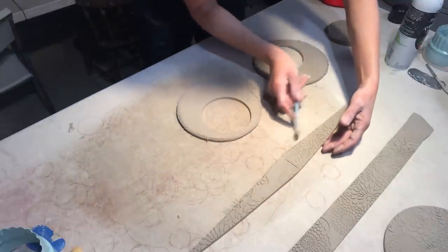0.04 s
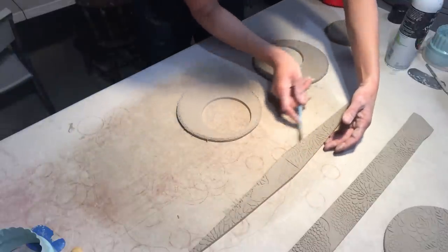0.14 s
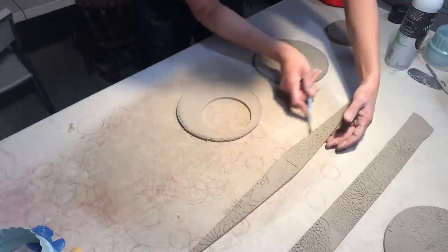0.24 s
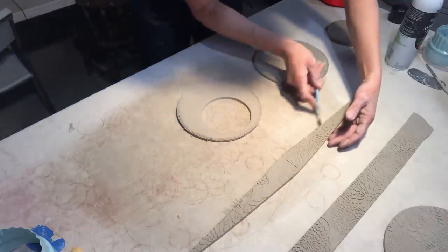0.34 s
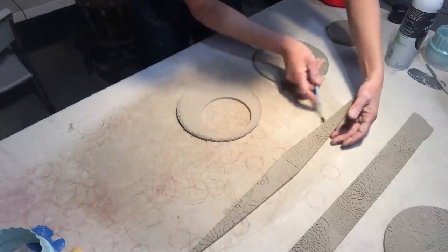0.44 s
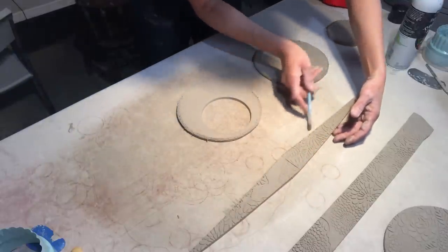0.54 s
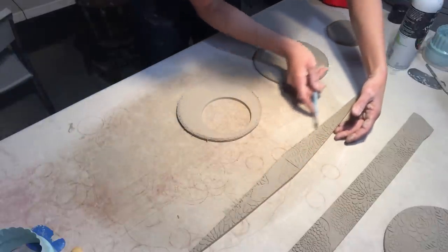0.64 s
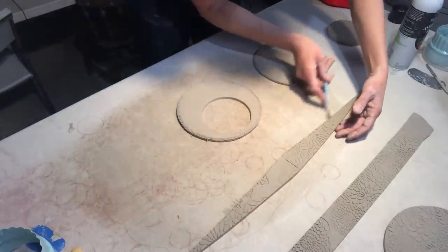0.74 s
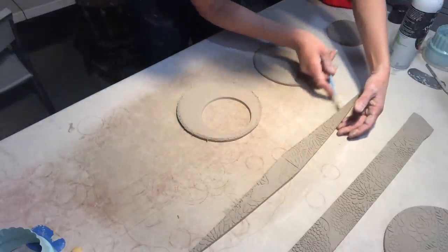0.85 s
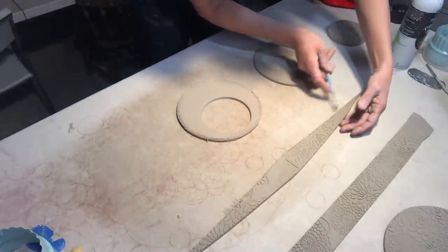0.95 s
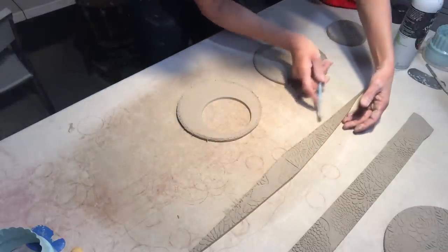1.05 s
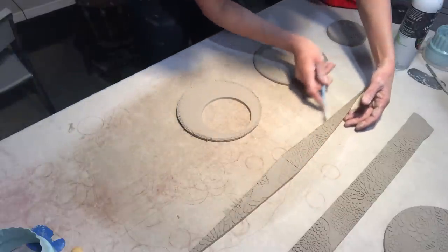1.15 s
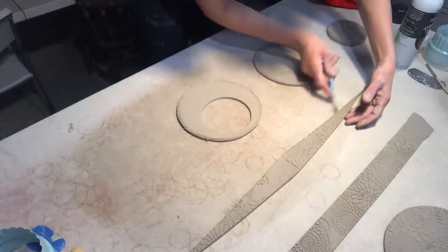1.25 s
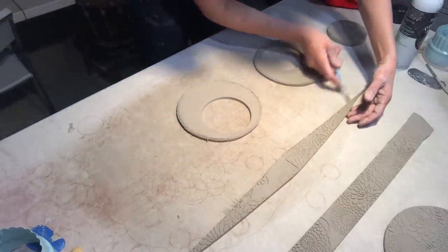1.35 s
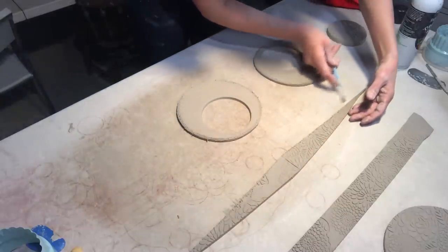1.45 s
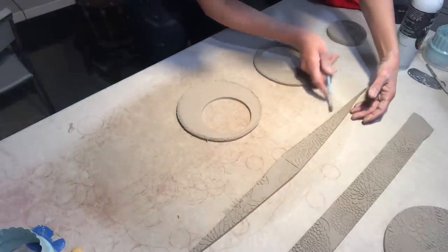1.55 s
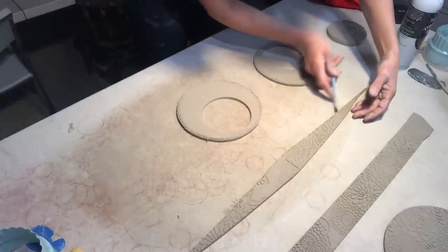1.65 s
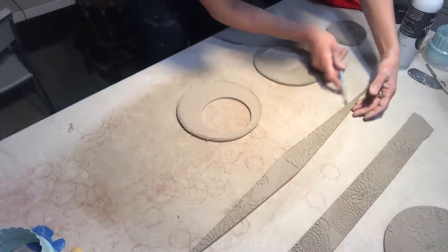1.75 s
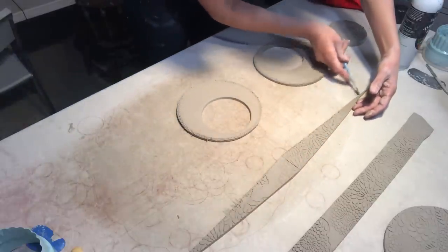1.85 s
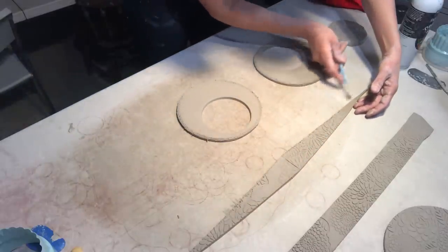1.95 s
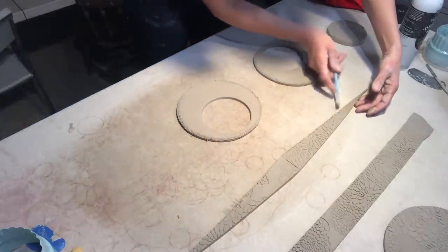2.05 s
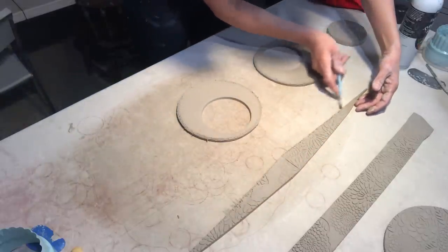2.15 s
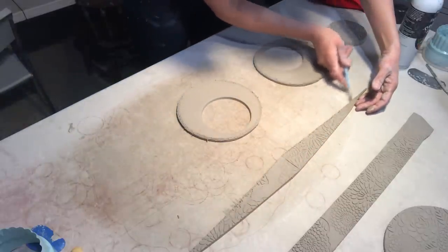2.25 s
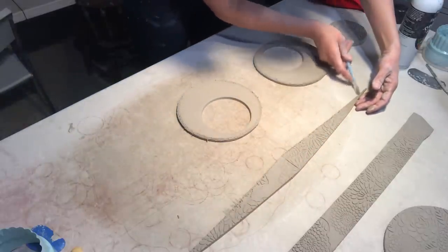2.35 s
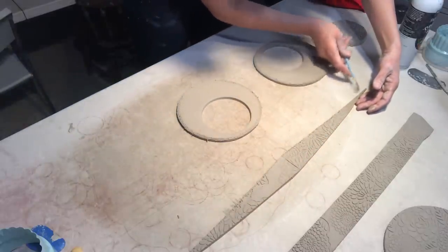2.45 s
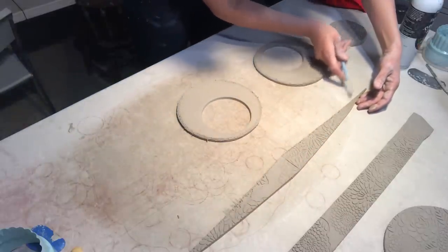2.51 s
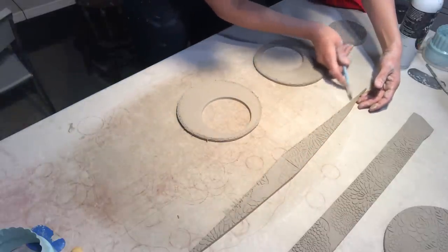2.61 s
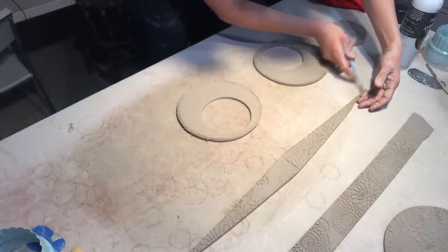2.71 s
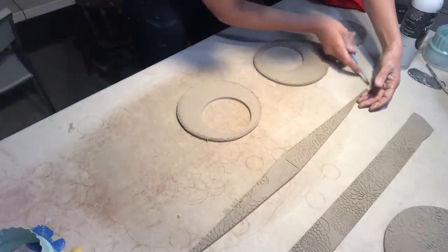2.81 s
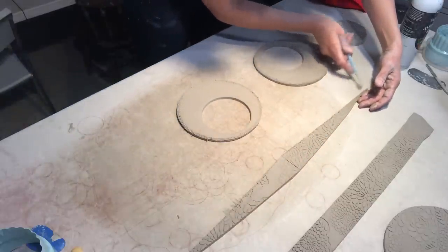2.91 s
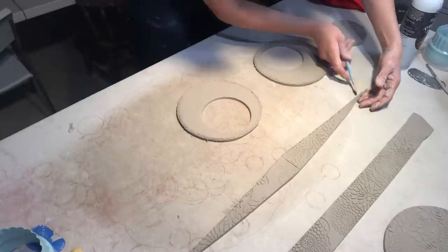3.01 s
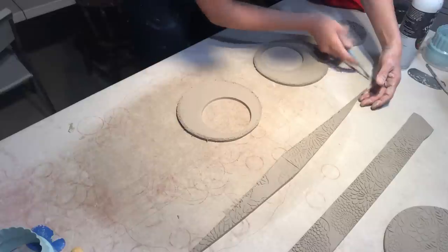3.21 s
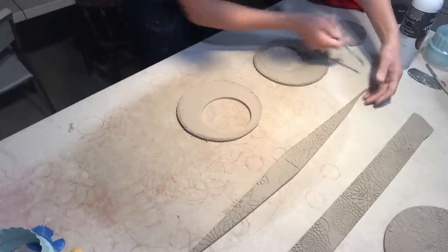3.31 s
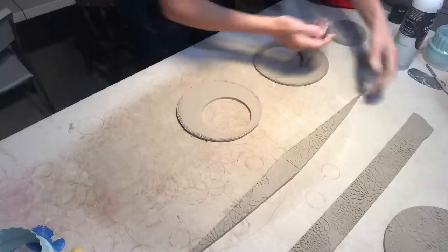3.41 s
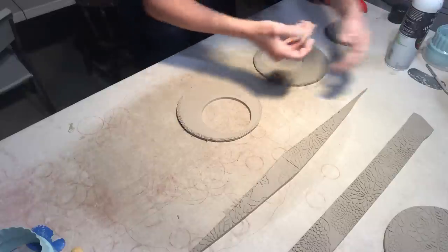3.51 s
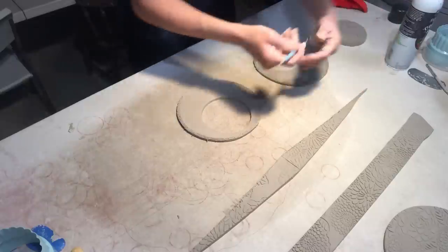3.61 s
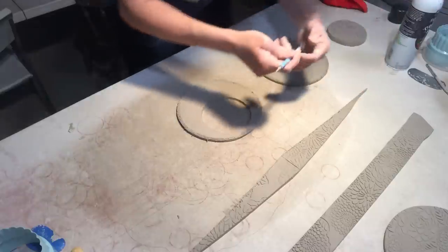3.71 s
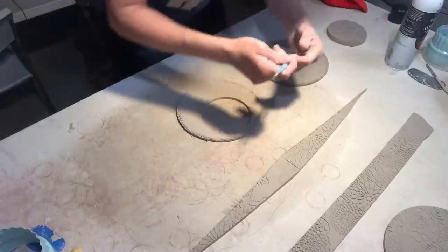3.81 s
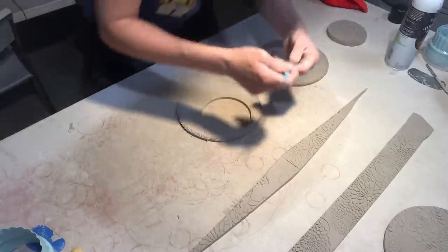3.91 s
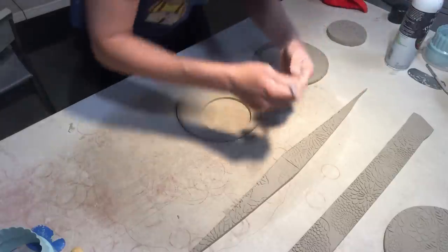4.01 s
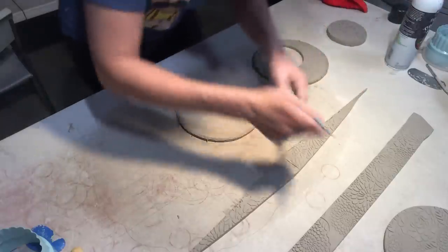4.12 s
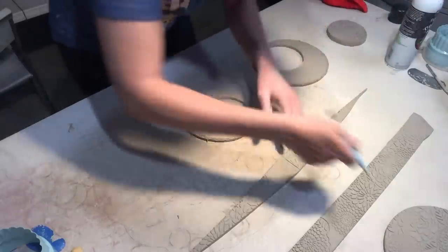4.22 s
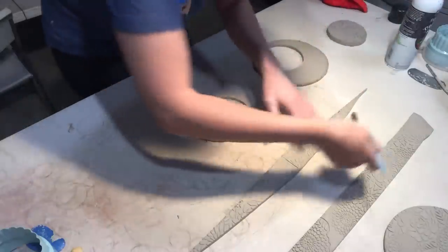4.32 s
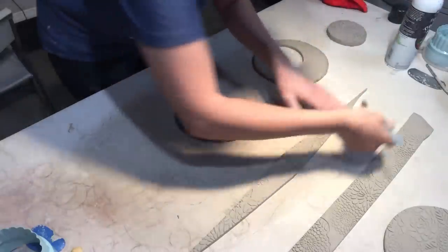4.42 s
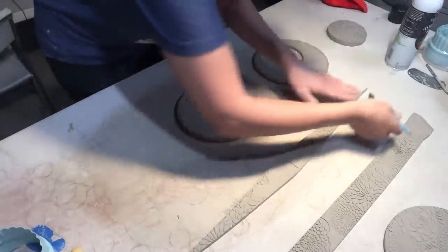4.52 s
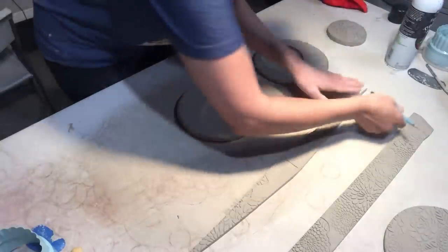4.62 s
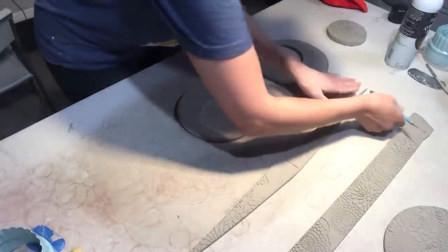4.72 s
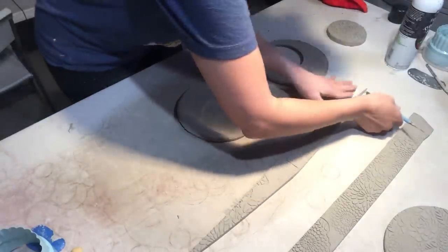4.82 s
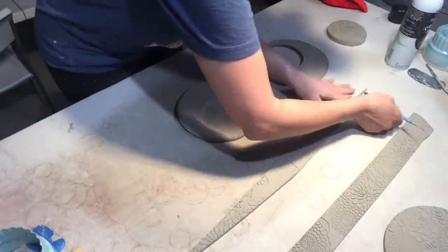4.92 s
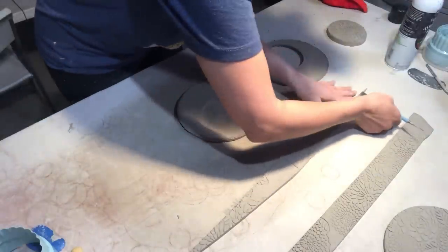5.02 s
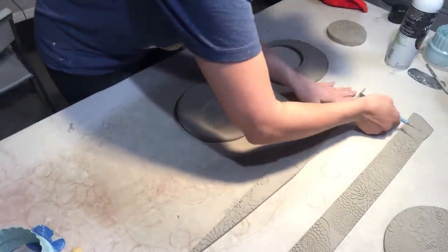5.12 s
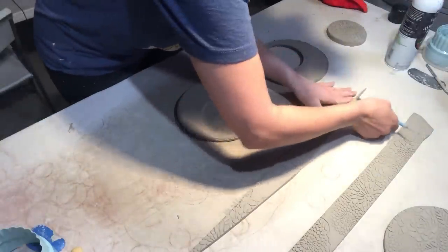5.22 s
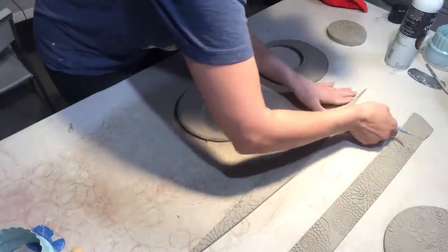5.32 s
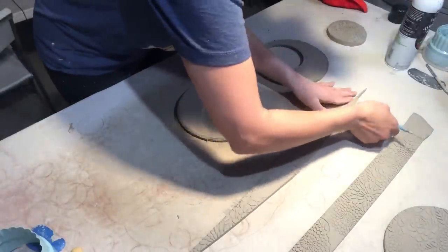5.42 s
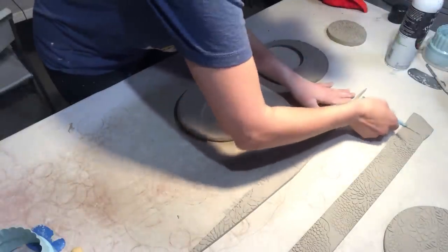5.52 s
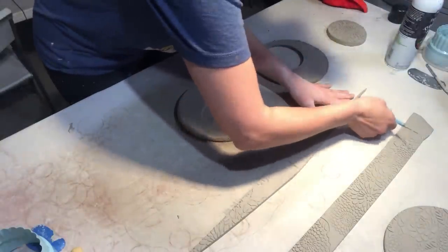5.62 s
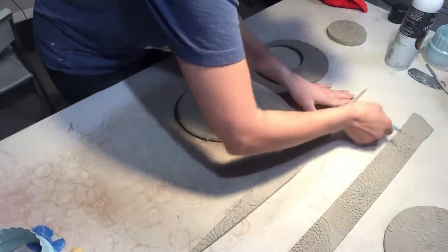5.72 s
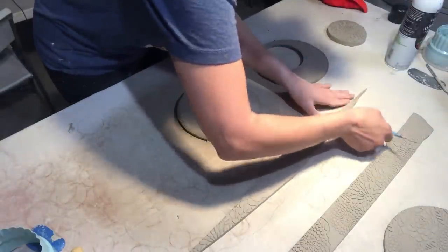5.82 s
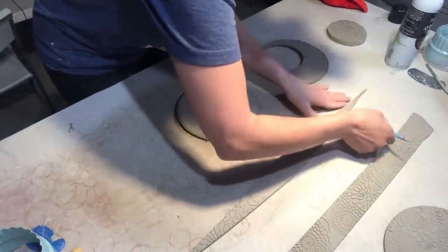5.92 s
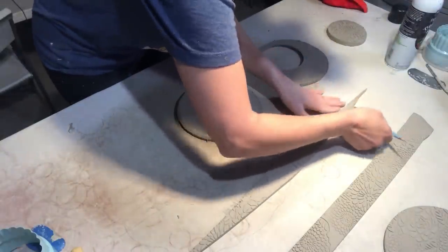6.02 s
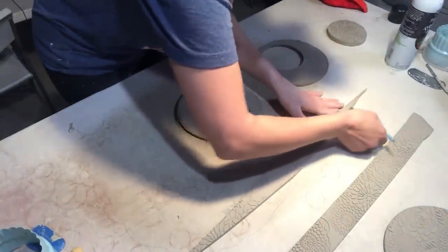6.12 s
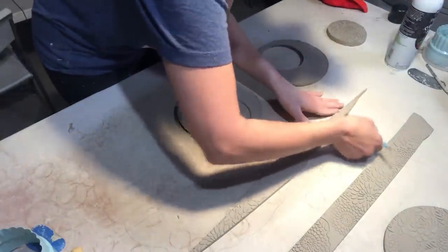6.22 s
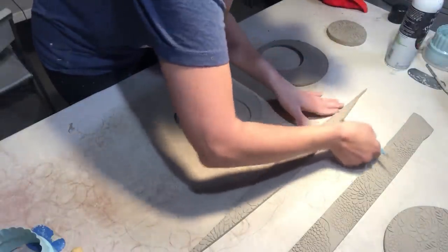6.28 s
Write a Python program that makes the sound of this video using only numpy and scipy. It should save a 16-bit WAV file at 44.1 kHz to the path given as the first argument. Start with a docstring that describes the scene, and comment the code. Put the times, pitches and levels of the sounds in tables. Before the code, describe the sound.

Light knocks and brief scratches repeat as a hand tool scores clay strips, stop, then resume more softly over faint ventilation hum.

```python
"""In a small, quiet room, a metal scoring tool scratches strips of damp clay on a covered work table.
Each stroke lands with a double knock. Then the tip drags through the gritty clay, and the snapping
sand grains shake the table and make the tool ring. After a pause, lighter strokes follow on a
second strip. Ventilation motors hum underneath, with a soft rush of air."""
import sys
import numpy as np
from scipy import signal
from scipy.fft import rfft, irfft
from scipy.io import wavfile
from scipy.ndimage import map_coordinates

SR = 44100
rng = np.random.default_rng(int(sys.argv[2]) if len(sys.argv) > 2 else 0)


def master_out(mix):
    """Clip the mix to full scale and print it as 16-bit PCM to the path in sys.argv[1]."""
    frames = np.transpose(np.atleast_2d(mix))
    ceiling = np.clip(frames, -1, 1)
    pcm = np.round(ceiling * 32767).astype(np.int16)
    wavfile.write(sys.argv[1], SR, pcm)


N = 280035
TIME = np.arange(N) / SR

# Each push of the tip through the clay: (start [s], end [s], relative level [dB],
# swell from start to end [dB], low shudder [dB], sharp grit [dB], hollow rub [dB])
PUSHES = [(0.207, 0.25, -50.5, 0, -5, 2, 10.5), (0.268, 0.457, -46, -1, -3, -3.5, 8),
          (0.709, 0.838, -45.5, -9, -1.5, -4.5, 0), (0.897, 0.963, -47.5, -1.5, 6.5, -2.5, -1.5),
          (1.207, 1.31, -45, -2.5, -4, -0.5, 6), (1.32, 1.461, -41, 2.5, -6, -5, 9.5),
          (1.698, 1.784, -47.5, -9, 4, -2, 0.5), (1.788, 1.947, -43, -1, -0.5, -3, 4),
          (2.21, 2.31, -48.5, 6.5, 2.5, -1.5, 4.5), (2.305, 2.393, -41, 5, -9.5, -8, 13),
          (2.42, 2.478, -46, 4, 1.5, -4, 5.5), (2.712, 2.879, -45, 1, 6, -3, -6),
          (3.152, 3.214, -45.5, -4, -1, -2, 1.5), (5.222, 5.372, -53, 3, 0.5, -10.5, 5.5),
          (5.691, 5.721, -48.5, 1, 2.5, -9, 6), (5.757, 5.837, -56.5, -2, 6, -5.5, 0),
          (5.853, 5.91, -46, 0.5, -1, -5.5, 4), (5.99, 6.10, -71.5, 4, -4, 3, -3),
          (6.168, 6.253, -57.5, 7, -5, -9, 18.5), (6.253, 6.335, -50, -2, -1, -7, 3)]
# The overall tone of the scratch on each strip: (frequency [Hz], relative level [dB])
FIRST_STRIP_TONE = [(60, -24.5), (140, -14), (200, -6.5), (350, 1), (500, 0), (700, -2.5), (1100, -3.5),
                    (2500, -7), (4000, -9), (7000, -21), (8300, -28), (12000, -35), (14000, -29),
                    (16000, -41)]
SECOND_STRIP_TONE = [(60, -35), (140, -18), (200, -8), (380, -2.5), (550, -7.5), (1100, -7.5), (2500, -10),
                     (4000, -10.5), (7000, -18.5), (8300, -25.5), (12000, -26.5), (14200, -24),
                     (16000, -33)]
# How the metal tool rings, which depends on how it is held:
# (pitch [Hz], width [Hz], boost on the first strip [dB], boost on the second strip [dB])
TOOL_RINGS = [(5630, 200, 4.5, 7), (6950, 110, 6, 4), (8830, 170, 11, 7), (10300, 99, 2, 1),
              (11330, 220, 10, 3), (12600, 600, -3, -6), (13240, 200, 14.5, 7), (14050, 460, 2, 2)]
FIRST_RINGS = [(hz, width, db) for hz, width, db, _ in TOOL_RINGS]
SECOND_RINGS = [(hz, width, db) for hz, width, _, db in TOOL_RINGS]

def scratches(strip_change_s=4):
    """The tool scores one strip of clay, then the other."""
    friction = grip(flutter_db=1.68, lumps_db=0.3, catch_s=0.005)
    on_first = [push for push in PUSHES if push[0] < strip_change_s]
    on_second = [push for push in PUSHES if push[0] >= strip_change_s]
    first = drags(on_first, FIRST_STRIP_TONE, FIRST_RINGS, friction,
                  gain_db=-1.79, sharp_db=9.0, wander=2.5, wander_hz=202, rub_width_hz=280)
    second = drags(on_second, SECOND_STRIP_TONE, SECOND_RINGS, friction,
                   gain_db=0.1, sharp_db=6.0, wander=3.0, wander_hz=199.8, rub_width_hz=410)
    return first + second


# Pitches that the table top boosts or swallows: (pitch [Hz], width [Hz], boost [dB])
TABLE_RINGS = [(201, 43, 2), (237.6, 17, 4.5), (268, 130, -3.5), (300, 9.6, 8), (370, 32, 3.5),
               (496.7, 21, 4), (631, 24, 3.5), (646, 10, 7), (700, 65, -6.5), (771, 18.7, 8.5),
               (806, 220, 1.5), (1038, 220, 2.5), (1165, 26, -6), (1234, 32, 1.5), (1388.5, 30, 11),
               (1449, 214, -9), (1750, 230, 3.5), (2094, 53, 6), (2210, 15, -10), (2335, 77, 5.5),
               (2628, 44, 5.5), (3010, 100, -3), (3097, 82, 5), (4054, 53, -17.5), (4050, 76, 6),
               (4810, 750, -4)]

def drags(pushes, tone, tool_rings, friction, gain_db, sharp_db, wander, wander_hz, rub_width_hz,
          wander_per_s=18, stall_s=0.015, stall_dull_db=2.5):
    """The tip ploughs through one strip, and the grit is heard through the table and the tool."""
    grains = grit(per_s=7000, spread_db=2.5) * friction
    scratch = unit_rms(through(grains, body(tone, TABLE_RINGS + tool_rings)))
    # cut the sound into short slices, so that its tone can change over time
    hz, t, slices = signal.stft(scratch, SR, nperseg=1024, noverlap=768)
    hz = hz[:, None]
    # the push that presses hardest at each moment sets level and tone
    gains = np.array([from_db(db) * pressure(start, end, swell) for start, end, db, swell, *_ in pushes])
    hardest = gains[:, np.minimum((t * SR).astype(int), N - 1)].argmax(axis=0)
    _, end, _, _, shudder_db, grit_db, rub_db = np.array(pushes)[hardest].T
    # pressing shakes the table, which shapes the bass
    tone_db = shudder_db / (1 + (hz / 700) ** 4)
    # sharp sand brightens the treble, which dulls as the tip slows at the end of a push
    stall = np.exp(np.minimum(t - end, 0) / stall_s)
    tone_db += (grit_db + sharp_db - stall_dull_db * stall) * (1 - 1 / (1 + (hz / 3800) ** 4))
    tone_db += rub_db * peak(hz, rub_pitch(t), rub_width_hz)
    tone_db += tool_glints(hz, t, width_hz=99)
    # as the tip travels, different pitches stand out at random
    places = np.broadcast_arrays(hz / wander_hz, t * wander_per_s)
    depth_db = wander * at_hz([(300, 1.1), (2000, 0.88), (7000, 1.7), (12000, 0.74)], hz)
    tone_db += depth_db * map_coordinates(rng.standard_normal((256, 256)), places, order=3, mode="mirror")
    _, scratch = signal.istft(slices * from_db(tone_db), SR, nperseg=1024, noverlap=768)
    return from_db(gain_db) * gains.max(axis=0) * scratch[:N]


def grit(per_s, spread_db):
    """Sand grains snap past the tip at random, a few much larger than the rest."""
    caught = rng.random(N) < per_s / SR
    sizes = from_db(spread_db * np.minimum(rng.exponential(1, N), 4))
    return unit_rms(caught * sizes * rng.choice([-1, 1], N))


def pressure(start, end, swell_db, arch_db=1, bite_s=0.011, lift_s=0.02):
    """The strength of one push: the tip sinks in, holds with a gentle arch and swell, and eases out."""
    along = np.clip((TIME - start) / (end - start), 0, 1)
    hold = from_db(swell_db * (along - .5) + arch_db * (np.sin(np.pi * along) - .5))
    return hold * np.exp(np.minimum(TIME - start, 0) / bite_s - np.maximum(TIME - end, 0) / lift_s)


# The tip catches on the coarsest grains: (time [s], surge [dB])
CATCHES = [(0.281, 3), (0.405, 7.5), (0.74, 5), (1.433, 3.5), (1.835, 3), (1.916, 4.5), (2.826, 2.5),
           (2.867, 2.5), (5.361, 3), (5.697, 2)]

def grip(flutter_db, lumps_db, catch_s):
    """Friction flutters all the time, swells over lumps in the clay and surges briefly at each catch."""
    surges = sum(db * np.exp(-((TIME - s) / catch_s) ** 2) for s, db in CATCHES)
    return from_db(flutter_db * drift(per_s=90) + lumps_db * drift(per_s=35) + surges)


def rub_pitch(t, start_hz=632, sag_hz_per_s=820, lowest_hz=300):
    """The pitch of the hollow rub starts high at each landing and sinks steadily."""
    landed = np.array(LANDINGS)[:, 0]
    age = t - landed[np.maximum(np.searchsorted(landed, t) - 1, 0)]
    return np.maximum(start_hz - sag_hz_per_s * age, lowest_hz)


# Moments when the tool sings briefly: (time [s], pitch [Hz], boost [dB], half length [s])
GLINTS = [(0.717, 1810, 12, .014), (1.282, 1800, 16, 0.018), (1.417, 4365, 16, 0.047),
          (1.47, 8700, 13, 0.036), (1.933, 9000, 10, 0.06), (2.295, 4300, 16, 0.043)]

def tool_glints(hz, t, width_hz):
    """The boost in dB as one ringing note of the tool swells and fades."""
    return sum(db * np.exp(-((t - s) / half_s) ** 2) * peak(hz, pitch, width_hz)
               for s, pitch, db, half_s in GLINTS)


# The tool lands on the clay: (time [s], relative level [dB], wait for the second blow [s],
# boost of the second blow [dB], treble of both blows of the knock [dB], extra thump [dB])
LANDINGS = [(0.1617, -28, 0.01, -6, -11, -9), (0.6471, -35.5, 0.0083, -18, -9.5, -2),
            (1.1716, -30, .011, -0.5, 0, -1.5), (1.6520, -34, 0.0094, -4, 0.5, -2),
            (2.1738, -30.5, 0.013, -2.5, -0.5, 2), (2.6590, -29, 0.0072, 1.5, -1.5, -6.5),
            (3.0936, -35, 0.0091, -1.5, -4, -1), (5.0650, -38.5, 0.0084, 0.5, -2.5, -7),
            (5.5716, -52.5, 0.028, 0, -1, 4), (5.6322, -54, 0.0057, -5, 3, 13),
            (6.118, -34, 0.012, -4, -1.5, -5)]
# The overall tone of a knock: (frequency [Hz], relative level [dB])
KNOCK_TONE = [(45, -40), (90, 3.5), (145, 0), (185, 7.5), (380, 3.5), (600, -2), (950, -0.5), (1350, 0),
              (1750, -13), (2600, -3.5), (4000, -6), (7500, -14), (9000, -27), (16000, -37)]

def knocks(gain_db=1.0, thump_gain_db=17.0, crunch_s=0.0051, rattle_s=0.013, size=4096):
    """The tip hits, then settles with a duller blow; each thumps the table, crushes grit and rattles."""
    force = np.zeros(N + 2 * size)
    age = np.arange(size) / SR
    thump = from_db(thump_gain_db) * butter(signal.unit_impulse(size), 580, "low", order=1)
    for s, db, wait_s, second_db, treble_db, thump_db in LANDINGS:
        bursts = rng.choice([-1, 1], (2, size)) * np.exp(-(age / crunch_s) ** 2)
        crunch = butter(bursts, 517, "high", order=1)
        hit, settle = crunch + (from_db(treble_db) - 1) * butter(crunch, 1530, "high", order=1)
        settle = butter(settle, 4970, "low", order=1)
        for when, blow_db, contact in ((s, db, hit), (s + wait_s, db + second_db, settle)):
            rattle = butter(rng.standard_normal(size), [250, 3040], "band") * np.exp(-age / rattle_s)
            blow = contact + from_db(-3.5) * rattle + from_db(thump_db) * thump
            start = round(when * SR)
            force[start:start + size] += from_db(blow_db + gain_db) * blow
    return through(force[:N], body(KNOCK_TONE, TABLE_RINGS + FIRST_RINGS))


def fading_stroke(level_db=-58, fade_s=0.049):
    """An earlier stroke is just dying away at the start."""
    scratch = through(rng.standard_normal(N), body(FIRST_STRIP_TONE, TABLE_RINGS + FIRST_RINGS))
    return from_db(level_db) * unit_rms(scratch) * np.exp(-TIME / fade_s)


# How long the room echoes: (frequency [Hz], time to fade by 60 dB [s])
ECHO_TIMES = [(150, 0.6), (500, 0.29), (2000, 0.44), (6000, 0.24), (14000, 0.22)]

def room_echo(build_s=0.00081):
    """Reflections blur into an echo that builds up quickly and dies sooner in the treble."""
    age = TIME[:SR * 3 // 4]
    edges = np.geomspace(80, 18000, num=9)
    echo = np.zeros(len(age))
    for low, high in zip(edges, edges[1:]):
        fade = from_db(-60 * age / at_hz(ECHO_TIMES, np.sqrt(low * high)))
        echo += butter(rng.standard_normal(len(age)), [low, high], "band") * fade
    echo *= 1 - np.exp(-age / build_s)
    return echo / np.linalg.norm(echo)


def room(x, echo_db=-8.0, cycles_per_s=0.697):
    """As hands and tool move about, the sound shifts between two patterns of reflections."""
    turn = 2 * np.pi * cycles_per_s * TIME
    echoes = sum(through(x * share, room_echo()) for share in (np.cos(turn), np.sin(turn)))
    return x + from_db(echo_db) * echoes


# The hum of the ventilation motors: (pitch [Hz], level [dB])
MOTORS = [(44.72, -65), (59.1, -64)]
# The tone of the moving air: (frequency [Hz], relative level [dB])
AIR_TONE = [(25, -15), (60, -7.5), (90, -14.5), (130, -17), (250, -19), (370, -20.5), (470, -25),
            (620, -24), (1400, -29.5), (3000, -34.5), (6500, -36.5), (8500, -40.5), (10500, -43.5),
            (15500, -42)]

def ventilation(air_db=-65.92, waver_db=0.6):
    """Two slow motors beat against each other over a soft rush of air."""
    hum = np.zeros(N)
    for hz, db in MOTORS:
        strength = np.sqrt(2) * from_db(db + waver_db * drift(per_s=4.3))
        hum += strength * np.sin(2 * np.pi * (hz * TIME + rng.random()))
    air = butter(through(rng.standard_normal(N), body(AIR_TONE)), 73, "high", order=3)
    return hum + from_db(air_db) * unit_rms(air)


def body(tone, rings=(), size=8192):
    """How an object answers a single tap: its overall tone with peaks and dips on top."""
    hz = np.arange(size // 2 + 1) * SR / size
    level_db = at_hz(tone, hz) + sum(db * peak(hz, pitch, width) for pitch, width, db in rings)
    # these steps make the ringing come after the tap, never before it
    cepstrum = irfft(np.log(from_db(level_db)))
    cepstrum[size // 2:] = 0
    response = irfft(np.exp(rfft(2 * cepstrum)))
    return response / np.linalg.norm(response)


def peak(hz, centre, width):
    """A bump of height 1 around one pitch."""
    return 1 / (1 + (2 * (hz - centre) / width) ** 2)


def drift(per_s):
    """A smooth random wobble, about 1 in size."""
    points = rng.standard_normal(N // 20)
    return unit_rms(np.interp(TIME * per_s, np.arange(len(points)), points))


def at_hz(points, hz):
    """Read between the rows of a table, giving each octave equal room."""
    points = np.array(points)
    return np.interp(np.log(hz + 1), np.log(points[:, 0]), points[:, 1])


def butter(x, hz, kind, order=2):
    """Keep the lows, the highs or a band of a sound."""
    return signal.sosfilt(signal.butter(order, hz, kind, fs=SR, output="sos"), x)


def through(x, response):
    """Pass a sound through an object or a room."""
    return signal.fftconvolve(x, response)[:N]


def from_db(db):
    return 10 ** (np.asarray(db) / 20)


def unit_rms(x):
    return x / np.sqrt(np.mean(x ** 2) + 1e-20)


def scene():
    """Scratches and knocks echo in the room, over the ventilation."""
    work = room(scratches() + knocks()) + fading_stroke()
    return (work + ventilation())[None]


def record(dry, cutoff_hz=15750):
    """The very highest treble is cut off steeply."""
    return signal.sosfilt(signal.ellip(10, .2, 70, cutoff_hz, fs=SR, output="sos"), dry)


dry = scene()
out = record(dry)
master_out(out)
```